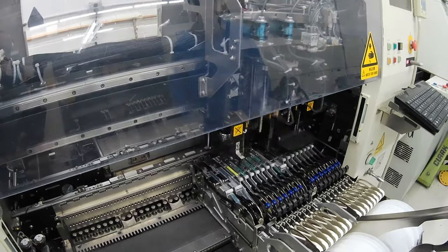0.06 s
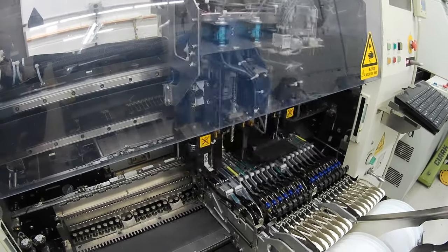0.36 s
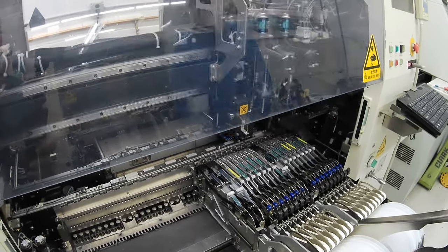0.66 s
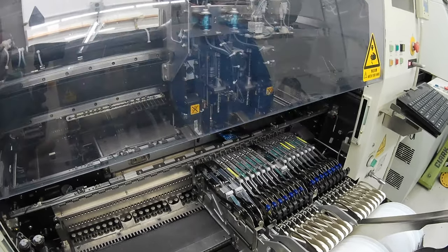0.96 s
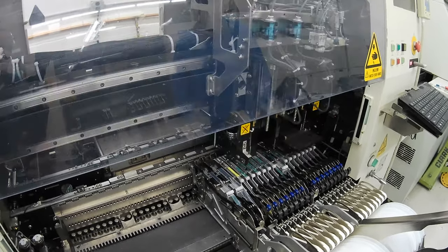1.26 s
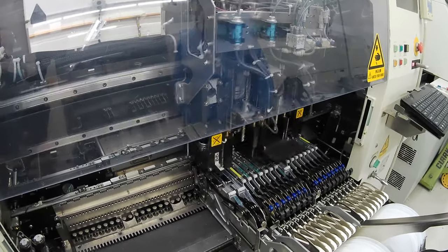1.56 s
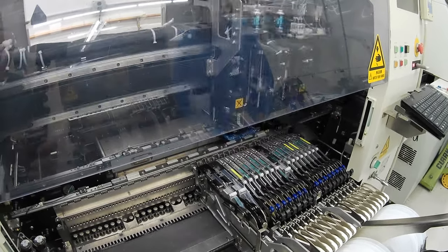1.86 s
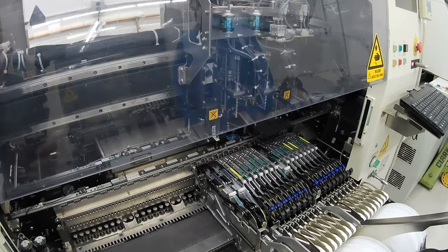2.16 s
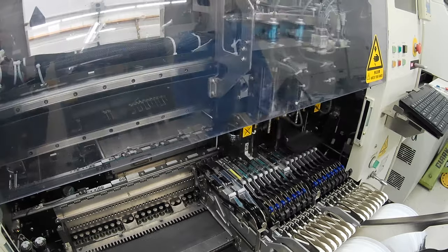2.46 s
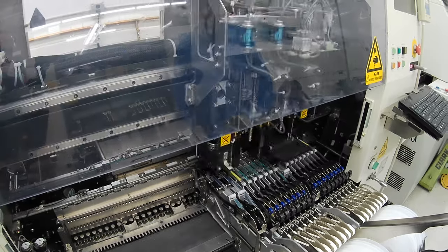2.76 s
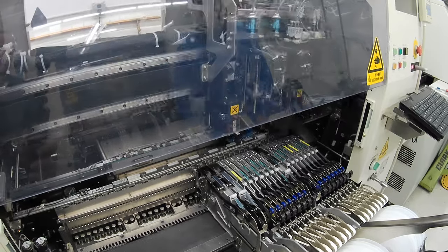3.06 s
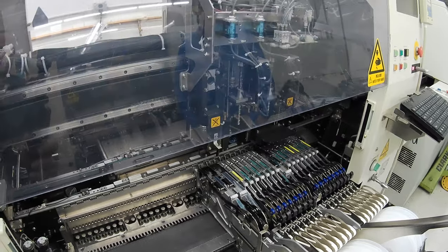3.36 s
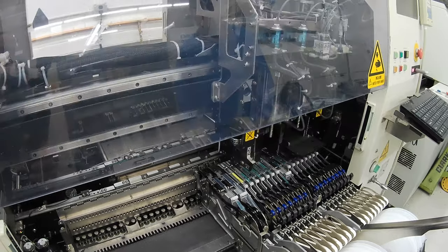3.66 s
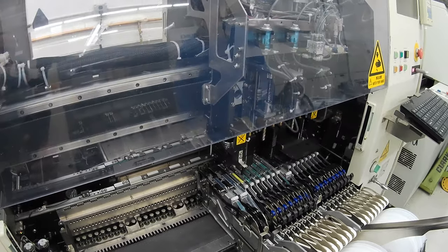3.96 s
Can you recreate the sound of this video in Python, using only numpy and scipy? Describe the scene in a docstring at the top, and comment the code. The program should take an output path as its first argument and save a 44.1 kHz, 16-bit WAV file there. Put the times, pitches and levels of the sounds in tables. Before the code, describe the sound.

A pick-and-place machine runs close by, its head rumbling along rails at about 0, 0.5, 1.1, 1.7, 2.3, 2.9 and 3.5 seconds. Between runs come chattering whirs, air hisses, metallic ticks and a faint, thin whine. Valves thump and crack, most clearly near 0.7, 1, 3 and 3.4 seconds. The machine groans briefly around 1.1 seconds. Fans and electrical hum continue throughout, with slight factory hall reverberation.

```python
"""A placement head rumbles along its ball rails in long runs, about every 0.6 s, and in short hops.
One microphone stands close to a pick-and-place machine, its hood shut, in a factory hall.
At the stops the nozzle drives whir, vacuum air hisses, valves fire with a thump and feeders tick.
The frame groans under braking and a thin servo whine rises. The hood adds short reflections and
the hall a faint tail; fans and mains hum go on beneath."""
import sys
import numpy as np
from scipy import signal
from scipy.fft import rfft, irfft
from scipy.io import wavfile
from scipy.ndimage import uniform_filter1d

SR = 44100
rng = np.random.default_rng(int(sys.argv[2]) if len(sys.argv) > 2 else 0)


def materialize(psi):
    """Save the field psi as 16-bit PCM at rate SR to the path in sys.argv[1].

    A 1-D psi becomes a single channel; in a 2-D psi each row is a channel.
    """
    bounded = np.clip(np.atleast_2d(psi).T, -1, 1)
    quanta = np.round(bounded * 32767).astype(np.int16)
    wavfile.write(sys.argv[1], SR, quanta)


N = 176400
T = np.arange(N) / SR


def from_db(db):
    """Decibels to gain."""
    return 10 ** (np.asarray(db) / 20)


def rms_one(x):
    """Scale to unit power."""
    return x / np.sqrt(np.mean(x ** 2) + 1e-20)


def evened(x):
    """Hold the power near one over about 30 ms."""
    return x / np.sqrt(np.abs(uniform_filter1d(x ** 2, size=1323)) + 1e-9)


def drift(rate):
    """Slow random motion of spread 1."""
    r = np.exp(-80 * np.pi * rate / SR)
    slow = signal.lfilter([1], [1, -2 * r, r * r], rng.standard_normal(N // 40 + 2002))[2000:]
    return np.interp(np.arange(N) / 40, np.arange(len(slow)), rms_one(slow))


def colour(x, spectrum):
    """Shape a steady signal by rows of Hz and dB; unit power."""
    hz, db = np.transpose(spectrum)
    bins = np.maximum(np.arange(N // 2 + 1) * SR / N, 1)
    gain = from_db(np.interp(np.log(bins), np.log(hz), db))
    return rms_one(irfft(rfft(x) * gain, N))


def noise(spectrum):
    """Coloured noise of unit power."""
    return colour(rng.standard_normal(N), spectrum)


def below(x, edge_hz):
    """The part of a steady signal under an edge."""
    return signal.sosfiltfilt(signal.butter(6, edge_hz, fs=SR, output="sos"), x)


def resonate(x, modes, swing_db=0, swings_per_s=13):
    """The signal plus the resonances it excites; a swing makes each waver in strength."""
    out = x
    for hz, width, db in modes:
        r = np.exp(-np.pi * width / SR)
        poles = [1, -2 * r * np.cos(2 * np.pi * hz / SR), r * r]
        push = x * from_db(db + swing_db * np.clip(drift(swings_per_s), -2, 1.2))
        out = out + signal.lfilter(np.array([1, 0, -1]) * (1 - r * r) / 2, poles, push + 1e-18)
    return out


def contacts(per_s, spread_db):
    """Tiny random impacts of uneven strength."""
    sizes = from_db(spread_db * np.minimum(rng.exponential(1, N), 4)) * rng.choice([-1, 1], N)
    return sizes * (rng.random(N) < per_s / SR)


def envelope(events, attack_s, release_s):
    """Each (start, hold, dB) swells up to its start, holds and dies away; powers sum."""
    power = 0
    for s, hold, db in events:
        fall = np.maximum(s - T, 0) / attack_s + np.maximum(T - s - hold, 0) / release_s
        power = power + from_db(db) ** 2 * np.exp(-2 * np.minimum(fall, 20))
    return np.sqrt(power)


# Long runs of the head. Each row: start and length at full speed in seconds, rail level in dB,
# frame rumble in dB, treble lift in dB.
RUNS = [(-.055, .049, -16.5, -29, 3), (.488, 0.057, -19.5, -30, 1), (1.093, 0.077, -18.5, -30.5, 0),
        (1.677, 0.059, -17.5, -26, 1.5), (2.33, .054, -20.5, -34.5, 2.5), (2.905, 0.059, -18.5, -26.5, 1.5),
        (3.544, 0.05, -21, -48, -5)]
# Spectra of the rails and the frame. Each row: frequency in Hz, relative level in dB.
RAIL_SPECTRUM = [(30, -65), (100, -15), (330, -12), (550, -4), (780, 3.5), (1100, 5.5), (1400, 1.5),
                 (2100, -4.5), (2800, -18.5), (4000, -22.5), (6000, -33), (10000, -52), (16000, -70)]
FRAME_SPECTRUM = [(40, -49), (110, -43), (170, 14), (260, 9.5), (400, -1.5), (600, -2), (1000, 9),
                  (3000, -79)]
# Ringing panels. Each row: frequency in Hz, width in Hz, gain in dB.
PANEL_MODES = [(231, 25, -14), (274, 23, 0.5), (385.2, 20, 8), (437, 19, 10), (525, 11, 5.5),
               (586.6, 15, 4), (648, 9.2, 1.5), (739.6, 9.9, 5.5), (840, 44, -6), (962, 41, -11),
               (1087, 13, -14), (1184, 15, 3.5), (1470, 73, -4.5), (1854, 13, -0.5), (1983, 15, 0),
               (2137, 44, 0.5)]
def rails(run_up_s=0.022, brake_s=0.038):
    """Bearing balls rattle, brighter with speed; with the motor they shake the panels and frame."""
    speed = np.minimum(envelope([(s, hold, 0) for s, hold, *_ in RUNS], run_up_s, brake_s), 1)
    balls = rms_one(contacts(per_s=3500, spread_db=2))
    shaking = balls + from_db(-6) * motor_growl(speed)
    rattle = evened(colour(resonate(shaking, PANEL_MODES, swing_db=2), RAIL_SPECTRUM))
    dull = below(rattle, edge_hz=4500)
    run = dull + (rattle - dull) * speed ** 1.7
    body = below(run, edge_hz=1750)
    rumble = evened(colour(resonate(rng.standard_normal(N), PANEL_MODES), FRAME_SPECTRUM))
    body_events = [(s, hold, db) for s, hold, db, _, _ in RUNS]
    treble_events = [(s, hold, db + lift) for s, hold, db, _, lift in RUNS]
    rumble_events = [(s + 0.023, hold, db) for s, hold, _, db, _ in RUNS]  # the frame answers late
    return (body * envelope(body_events, run_up_s, brake_s)
            + (run - body) * envelope(treble_events, run_up_s, brake_s)
            + rumble * envelope(rumble_events, run_up_s, release_s=0.07)
            + hops(balls) + jolts())


def motor_growl(speed, top_hz=370, jitter=0.05):
    """Uneven motor pulses whose rate rises and falls with the head's speed."""
    pulse_count = np.cumsum(top_hz * np.sqrt(speed) * (1 + jitter * drift(61.5))) / SR
    return np.diff(np.floor(pulse_count), prepend=0) * np.sqrt(SR / top_hz)


# Each row: start and length at full speed in seconds, level in dB.
SHORT_HOPS = [(.135, 0.0073, -31), (.232, 0.033, -28), (.789, 0.053, -22.5), (1.395, 0.045, -31.5),
              (1.972, 0.052, -30.5), (2.25, 0.0091, -33), (2.615, 0.021, -32), (3.075, 0.013, -38),
              (3.18, 0.061, -30.5)]
# Each row: frequency in Hz, relative level in dB.
HOP_SPECTRUM = [(150, -37), (500, -13.5), (780, -2.5), (900, 5.5), (1050, -1), (1190, 4.5), (1450, -6),
                (2100, -4.5), (2800, -20.5), (4000, -23), (16000, -95)]
def hops(balls):
    """Between runs the head hops a short way, and its balls ring the panels."""
    rattle = evened(colour(resonate(balls, PANEL_MODES), HOP_SPECTRUM))
    return rattle * envelope(SHORT_HOPS, attack_s=0.013, release_s=0.025)


# Each row: start in seconds, level in dB.
HEAD_JOLTS = [(0.478, -19.5), (0.512, -23), (1.111, -18.5), (2.625, -30), (2.91, -28), (2.948, -16),
              (3.53, -22), (3.568, -19.5), (3.632, -24)]
def jolts():
    """The head jerks on its rails with a short clack."""
    events = [(s, 0.003, db) for s, db in HEAD_JOLTS]
    return evened(noise(RAIL_SPECTRUM)) * envelope(events, attack_s=0.00078, release_s=0.0038)


# Each row: start and length in seconds, then whir, rattle and air levels in dB.
NOZZLE_STROKES = [(0.054, 0.097, -35, -37.5, -44), (0.16, 0.18, -36.5, -45, -50.5),
                  (0.296, .11, -35.5, -35.5, -39), (0.422, .17, -41, -36, -45.5),
                  (.57, 0.12, -39.5, -41, -41.5), (0.681, 0.041, -32.5, -35.5, -54),
                  (0.739, 0.13, -38, -48, -54.5), (0.9, 0.1, -38.5, -44.5, -43.5),
                  (0.983, 0.088, -32.5, -44, -41.5), (1.104, 0.074, -30, -37, -56),
                  (1.229, .12, -33.5, -37, -45), (1.356, 0.099, -37, -42.5, -60),
                  (1.472, .12, -32.5, -35, -40), (1.599, 0.16, -35, -37, -43.5),
                  (1.812, .025, -44, -48, -43), (1.851, 0.046, -30.5, -38.5, -44),
                  (2.005, 0.066, -36.5, -41.5, -41), (2.09, 0.077, -42, -47.5, -54),
                  (2.191, 0.1, -38, -39.5, -46), (2.391, 0.071, -50, -54, -49),
                  (2.454, 0.098, -35, -39.5, -46), (2.566, 0.094, -36, -43.5, -50),
                  (2.684, 0.062, -40, -35.5, -42.5), (2.763, 0.059, -34.5, -33.5, -39.5),
                  (2.846, .16, -40, -40, -47), (3.061, 0.044, -31, -31.5, -34.5),
                  (3.134, .14, -42, -47.5, -53), (3.297, 0.14, -42.5, -51, -50.5),
                  (3.438, 0.061, -35, -40, -44.5), (3.655, 0.12, -36, -36, -42.5),
                  (3.788, 0.07, -40, -40.5, -46), (3.902, 0.029, -30.5, -31.5, -42.5),
                  (3.966, .05, -36.5, -32.5, -35)]
# Metal of the drives. Each row: frequency in Hz, width in Hz, gain in dB.
METAL_MODES = [(763, 62, 8.5), (1086, 58, 4.5), (1572, 26, 7.5), (1682, 50, 5.5), (1810, 106, 1.5),
               (2133, 78, -1), (2275, 49, 3), (2575, 170, 3.5), (2934, 124, 0), (3134, 43, 5.5),
               (3370, 90, 14.5), (3716, 96, 18), (5430, 130, 4), (7020, 104, 12)]
# Spectra of the drives and the vacuum air. Each row: frequency in Hz, relative level in dB.
DRIVE_SPECTRUM = [(200, -48), (500, -8), (850, 5), (1350, 6.5), (1700, 12.5), (2300, 5.5), (3200, -1.5),
                  (3700, -26.5), (4500, -11.5), (7000, -24.5), (16000, -70)]
AIR_SPECTRUM = [(200, -49), (1500, 4), (3000, 10.5), (4100, 16.5), (4500, 2), (5150, 16.5), (5900, 12),
                (6600, -0.5), (9000, -11), (11000, -8.5), (16000, -54)]
def nozzles(attack_s=0.0069, release_s=0.011):
    """Drive teeth chatter in the metal, a whir below and a fine rattle above; gritty air hisses."""
    teeth = contacts(per_s=1800, spread_db=-2)
    chatter = colour(resonate(teeth, METAL_MODES, swing_db=12.5), DRIVE_SPECTRUM)
    low = below(chatter, edge_hz=2140)
    flutter = rms_one(from_db(drift(53)))
    whir_events = [(s, hold, db) for s, hold, db, _, _ in NOZZLE_STROKES]
    rattle_events = [(s, hold, db) for s, hold, _, db, _ in NOZZLE_STROKES]
    air_events = [(s, hold, db) for s, hold, _, _, db in NOZZLE_STROKES]
    whir = evened(low) * envelope(whir_events, attack_s, release_s)
    rattle = evened(chatter - low) * envelope(rattle_events, attack_s, release_s)
    air = evened(colour(contacts(per_s=1500, spread_db=2), AIR_SPECTRUM))
    return (whir + rattle) * flutter + air * envelope(air_events, attack_s=0.012, release_s=0.022)


# Each row: start in seconds, thump level in dB, thump pitch in Hz, crack level in dB,
# puff level in dB, puff length in seconds.
VALVE_KNOCKS = [(0.541, -28, 178, -36, -63, 0.0079), (0.668, -25.5, 183, -25, -34.5, 0.011),
                (0.956, -26, 146, -21, -38, 0.0095), (1.159, -37, 296, -29.5, -61, .008),
                (1.85, -27.5, 194, -30, -39, 0.018), (2.159, -32, 153, -23, -35, 0.0059),
                (3.049, -21.5, 165.5, -32, -34, 0.028), (3.373, -25.5, 178, -22, -33.5, 0.0034),
                (3.568, -27.5, 171, -45, -56, .005)]
# Spectra of the crack and the puff. Each row: frequency in Hz, relative level in dB.
CRACK_SPECTRUM = [(300, 19.5), (800, -15), (1400, 6), (2300, 12), (3500, 0), (5500, 4), (8000, -17.5),
                  (16000, -26)]
PUFF_SPECTRUM = [(1500, 6), (3500, -9.5), (5300, 12.5), (6500, -0.5), (9000, 0.5), (11000, -27),
                 (16000, -62)]
# Steel parts that ring on. Each row: frequency in Hz, width in Hz, gain in dB.
STEEL_MODES = [(1643, 10, 1.5), (1724, 8.3, -1.5), (1894, 10, 0.5), (2130, 22, 4), (2563, 12, 6),
               (3210, 16, 8), (4160, 20, 2.5), (5100, 33, 4)]
def valves(crack_lag_s=0.0015, low_cut_hz=88):
    """A valve fires: a puff of air, a thump of the head and a crack that leaves the steel ringing."""
    thumps = sum(thump(s, db, hz) for s, db, hz, *_ in VALVE_KNOCKS)
    thumps = signal.sosfilt(signal.butter(4, low_cut_hz, "high", fs=SR, output="sos"), thumps)
    metal = evened(colour(resonate(rng.standard_normal(N), METAL_MODES), CRACK_SPECTRUM))
    crack_events = [(s + crack_lag_s, 0.003, db) for s, _, _, db, _, _ in VALVE_KNOCKS]
    puff_events = [(s, hold, db) for s, *_, db, hold in VALVE_KNOCKS]
    crack = metal * envelope(crack_events, attack_s=0.0022, release_s=0.0083)
    puff = noise(PUFF_SPECTRUM) * envelope(puff_events, attack_s=0.006, release_s=0.0091)
    return thumps + resonate(crack, STEEL_MODES) + puff


# Each row: multiple of the pitch, relative level in dB, decay time constant in seconds.
HEAD_MODES = [(.6, -10.5, 0.052), (.88, -8.5, 0.021), (1.18, -3.5, 0.013), (1.65, -11, 0.042)]
def thump(s, db, hz, rise_s=0.003):
    """One cushioned blow sets the low modes of the head ringing."""
    age = np.clip(T - s, 0, 0.5)
    ring = 0
    for i, (ratio, level, decay_s) in enumerate(HEAD_MODES):
        gain = (-1) ** i * 2 * from_db(db + level)
        ring = ring + gain * np.sin(2 * np.pi * ratio * hz * age) * np.exp(-age / decay_s)
    return ring * (1 - np.exp(-age / rise_s))


# Each row: start in seconds, level in dB.
FEEDER_TICKS = [(.07, -43), (.304, -24.5), (0.341, -31), (.424, -36), (1.012, -23), (1.474, -24),
                (1.515, -31), (1.546, -42), (1.577, -40), (2.214, -33), (2.232, -27), (2.251, -25.5),
                (2.483, -30), (2.523, -34), (2.545, -29), (2.622, -32), (2.691, -23.5), (2.698, -24),
                (2.736, -31), (2.771, -41), (2.783, -32), (2.812, -38), (2.947, -20), (3.436, -38),
                (3.464, -23), (3.475, -27.5), (3.668, -35), (3.717, -34), (3.734, -24.5), (3.766, -32),
                (3.842, -34), (3.904, -40), (3.945, -27.5), (3.977, -26)]
def ticks():
    """Feeders and nozzles make light metal contacts that leave the steel ringing."""
    metal = evened(colour(resonate(rng.standard_normal(N), METAL_MODES, swing_db=8), DRIVE_SPECTRUM))
    events = [(s, 0.002, db) for s, db in FEEDER_TICKS]
    return resonate(metal * envelope(events, attack_s=0.00025, release_s=0.0078), STEEL_MODES)


# Each row: start and length in seconds, pitch in Hz, level in dB.
FRAME_GROANS = [(0, 0.0045, 392, -25), (1.108, 0.076, 372, -24), (1.145, 0.04, 282, -21),
                (1.2, 0.11, 274, -38), (1.807, .07, 313, -42), (2.981, 0.13, 221, -31.5),
                (3.394, 0.051, 255, -37.5)]
# Each row: multiple of the pitch, relative level in dB.
GROAN_SPECTRUM = [(.3, -34), (.75, -29), (.9, 7), (1.1, 2), (1.28, -7.5), (3, -66)]
def groans():
    """Low resonances of the frame swell and fade under hard braking."""
    out = 0
    for s, length, hz, db in FRAME_GROANS:
        band = evened(noise([(ratio * hz, level) for ratio, level in GROAN_SPECTRUM]))
        out = out + band * envelope([(s, length, db)], attack_s=0.012, release_s=0.017)
    return out


# Each row: start and length in seconds, level in dB.
AIR_SPITS = [(.345, 0.011, -45.5), (1.32, 0.11, -52.5), (1.52, 0.032, -46.5), (2.0, 0.036, -44),
             (2.525, 0.0052, -46), (2.73, 0.022, -46), (3.045, 0.0081, -40), (3.735, 0.013, -47.5),
             (3.945, 0.024, -45)]
# Each row: frequency in Hz, relative level in dB.
SPIT_SPECTRUM = [(3000, -23), (5500, 11), (7200, 8), (9000, 7.5), (11000, -33), (16000, -15)]
def spits():
    """The nozzles let out short, bright jets of air."""
    return noise(SPIT_SPECTRUM) * envelope(AIR_SPITS, attack_s=0.0099, release_s=0.0059)


# Each row: start and length in seconds, level in dB.
SERVO_WHINES = [(0.311, 0.17, -48.5), (1.49, 0.23, -46.5), (2.196, 0.14, -52), (2.73, 0.19, -60),
                (3.44, 0.15, -49)]
def servo(start_hz=4120, rise_hz_per_s=1100, width_hz=150):
    """A rough, thin whine rises as the motor winds up."""
    roughness = drift(width_hz) + 1j * drift(width_hz)
    out = 0
    for s, length, db in SERVO_WHINES:
        hz = start_hz + rise_hz_per_s * np.clip(T - s, 0, length)
        whine = np.real(roughness * np.exp(2j * np.pi * np.cumsum(hz) / SR))
        out = out + whine * envelope([(s, length, db)], attack_s=0.018, release_s=0.031)
    return out


# Fan and mains tones. Each row: frequency in Hz, level in dB.
HUM_TONES = [(58.5, -50), (105, -52.5), (119, -50), (242, -55), (275, -52.5), (323, -51), (379, -59.5),
             (942, -56), (1098, -60), (1178, -57)]
# Each row: frequency in Hz, relative level in dB.
FAN_SPECTRUM = [(25, -8.5), (45, -16), (80, -3), (105, -6), (150, -1), (240, 6), (330, -5), (400, -6),
                (600, -9), (780, -3.5), (1200, -12), (1750, -6.5), (2400, -16), (3300, -13), (4500, -29.5),
                (5500, -23.5), (7000, -26), (9000, -25.5), (11000, -49.5), (16000, -42)]
def fans(rush_db=-40, waver_db=2):
    """Behind the machine's work, fans rush with a slight waver over a wavering hum."""
    hum = 0
    for hz, db in HUM_TONES:
        gain = np.sqrt(2) * from_db(db) * (1 + 0.3 * drift(2.3))
        hum = hum + gain * np.sin(2 * np.pi * hz * T + 0.6 * drift(2.8))
    return hum + noise(FAN_SPECTRUM) * from_db(rush_db + waver_db * drift(21.0))


def reflections(x, t60_s):
    """A dense dying tail of unit gain, 3 ms behind the direct sound."""
    t = T[:SR // 2]
    tail = rng.standard_normal(len(t)) * from_db(-60 * t / t60_s) * (t > 0.003)
    return signal.fftconvolve(x, tail / np.linalg.norm(tail))[:N]


def hood_and_hall(x, hood_db=-13, hall_db=-22.5):
    """Close up the direct sound leads, then short reflections in the hood and a faint hall tail."""
    hood = from_db(hood_db) * reflections(x, t60_s=0.15)
    hall = from_db(hall_db) * reflections(x, t60_s=0.91)
    return (x + hood + hall) / np.hypot(1, from_db(hood_db))


def scene():
    """The working head under its hood, and the fans, in mono from beside the machine."""
    machine = rails() + groans() + nozzles() + servo() + spits() + valves() + ticks()
    return (hood_and_hall(machine) + fans())[None]


def record(dry):
    """The microphone's top end falls steeply, 70 dB down by 16.4 kHz."""
    return signal.sosfilt(signal.cheby2(12, 70, 16400, fs=SR, output="sos"), dry)


dry = scene()
out = record(dry)
materialize(out)
```